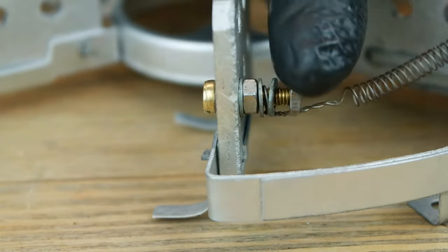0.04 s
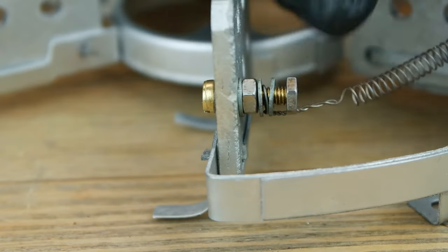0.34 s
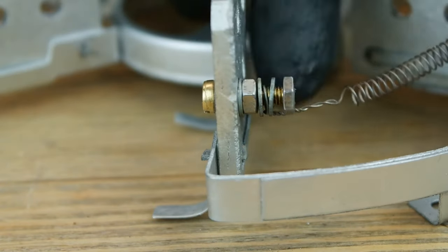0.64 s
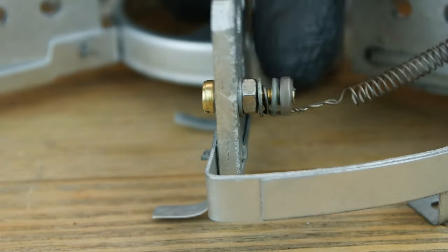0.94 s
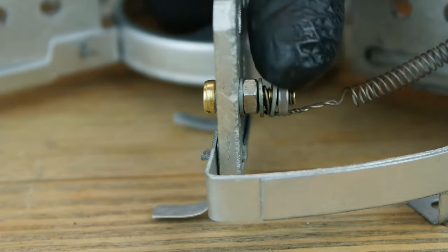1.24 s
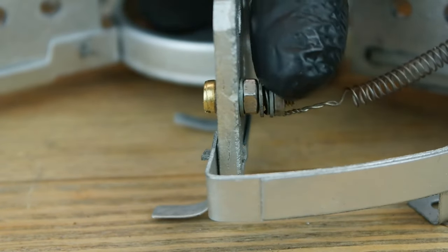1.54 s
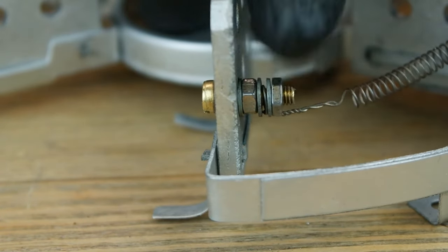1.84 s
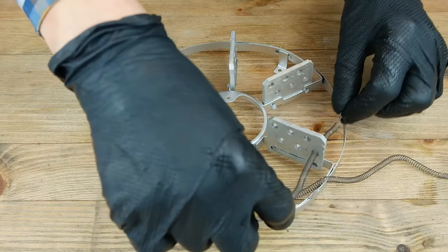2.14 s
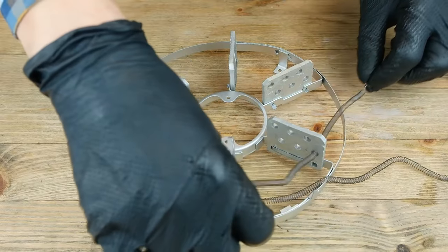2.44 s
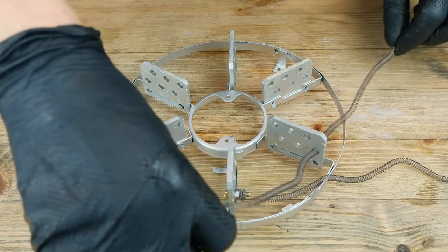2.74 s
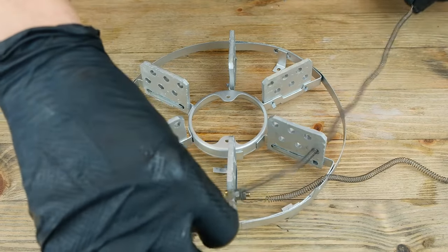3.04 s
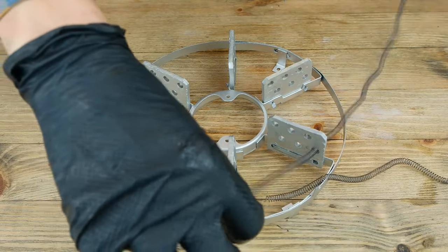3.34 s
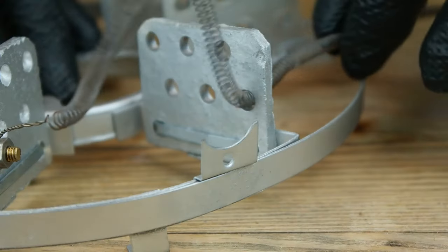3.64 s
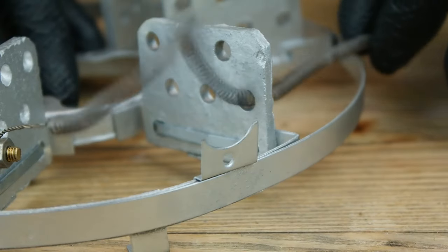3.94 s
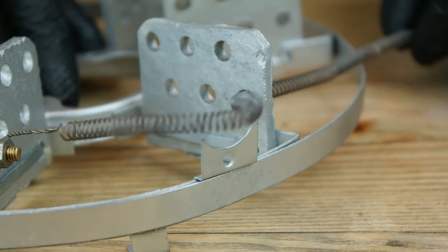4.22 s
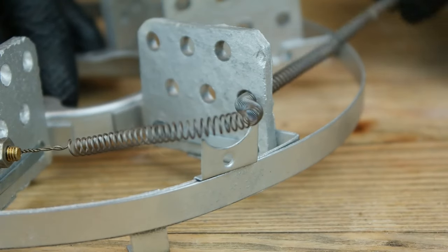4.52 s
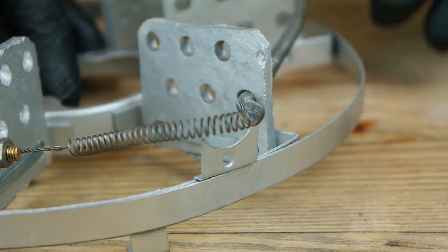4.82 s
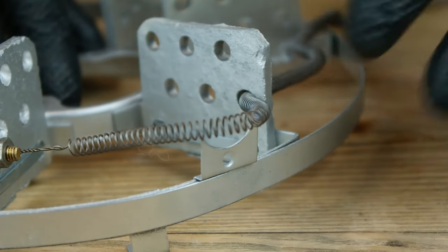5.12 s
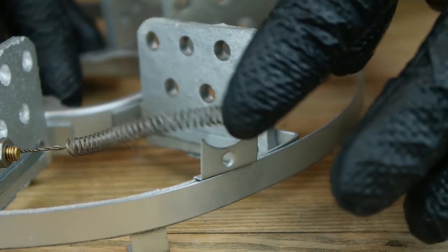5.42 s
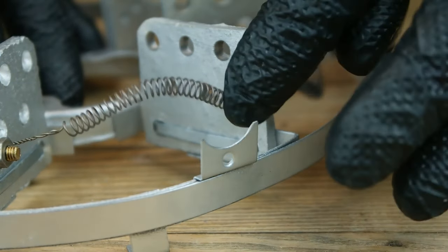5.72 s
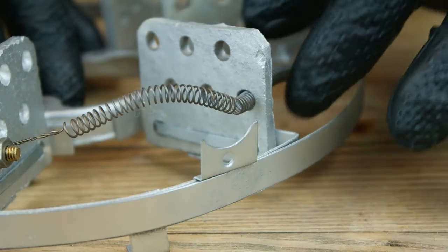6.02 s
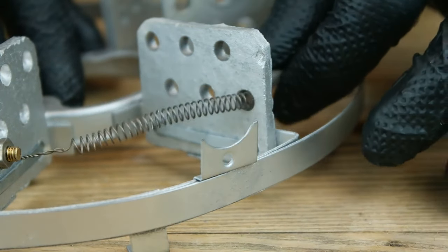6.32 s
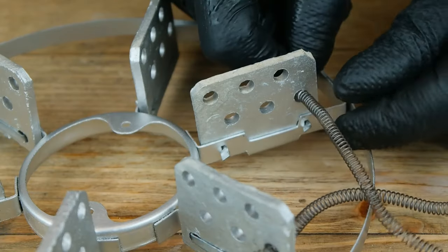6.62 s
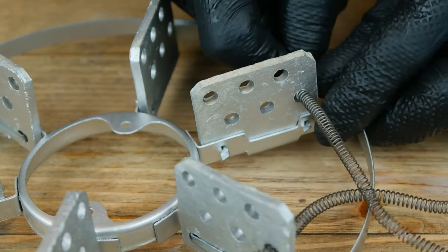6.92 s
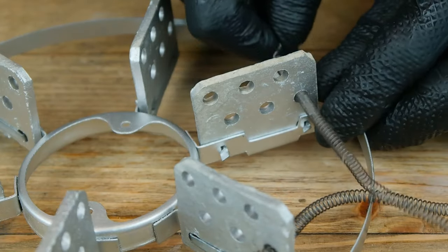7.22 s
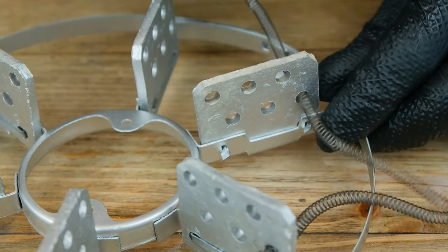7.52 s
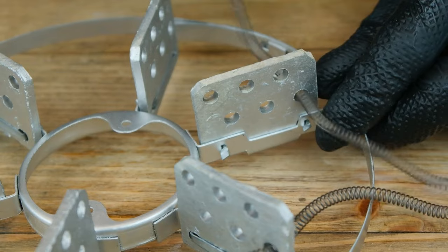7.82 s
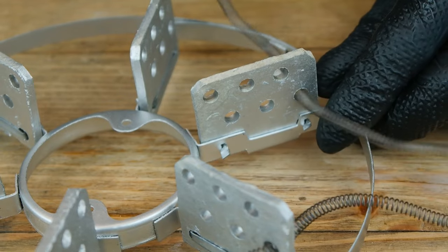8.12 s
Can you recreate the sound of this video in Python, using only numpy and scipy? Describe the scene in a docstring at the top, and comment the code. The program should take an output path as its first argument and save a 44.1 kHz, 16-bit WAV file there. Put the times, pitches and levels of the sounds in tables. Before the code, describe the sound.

Close up in a quiet room, light metallic ticks and tiny rasps come from a nut turning on its thread. A coil of wire then drags over the edges of a metal frame, building into a cluster of catches that rattle, zing and ring like a shaken spring. The frame bumps softly on a wooden bench. A few more snags ring out, the ringing cuts off, and the coil scrapes through once more.

```python
"""A long wire coil is threaded through the plates of a metal frame, after gloved fingers have spun a
small nut onto a terminal. The nut rasps and ticks on its bolt; then the turns of the coil scrape, snag
and zing on the edges of the holes. A snag sets the slack coil shimmering like a spring reverb or, when
the coil is taut, rings the frame, which stands on a wooden bench in a quiet room."""
import sys
import numpy as np
from scipy import signal
from scipy.fft import rfft, irfft
from scipy.io import wavfile
from scipy.ndimage import uniform_filter1d

SR = 44100
rng = np.random.default_rng(int(sys.argv[2]) if len(sys.argv) > 2 else 0)


def persist_wave(psi):
    """Save psi, clipped to +-1, as 16-bit WAV."""
    counts = np.round(np.clip(psi, -1, 1) * 32767).astype(np.int16)
    wavfile.write(sys.argv[1], SR, np.atleast_2d(counts).T)


N = 368676
TIME, BINS = np.arange(N) / SR, np.fft.rfftfreq(N, 1 / SR)

# The two long pulls of the coil through a hole. Each row: time in seconds, effort in dB.
FIRST_PULL = [(2.07, -70), (2.08, -60.5), (2.248, -58), (2.288, -70), (2.32, -57), (2.448, -44.5),
              (2.524, -57.5), (2.638, -39), (2.814, -46.5), (2.894, -38), (3.092, -44), (3.104, -41),
              (3.5, -43.5)]
LAST_PULL = [(7.17, -57), (7.672, -40), (7.812, -44), (7.832, -41.5), (7.978, -44), (8.098, -39.5),
             (8.17, -46), (8.31, -37), (8.36, -43)]
# The colour of the coil's shimmer. Each row: frequency in Hz, relative level in dB.
COIL_SPECTRUM = [(35, -30), (60, -29), (110, -14), (200, -9.5), (300, -14.5), (400, -0.5), (520, -5),
                 (650, -4.5), (1000, -3), (1750, -4), (2600, -7), (3400, -11), (13800, -12), (15500, -12)]


def amp(db):
    """Decibels to gain."""
    return 10 ** (np.asarray(db) / 20)


def unit_rms(x):
    """Scales to rms 1."""
    return x / np.sqrt(np.mean(x ** 2) + 1e-20)


def curve_at(points, hz):
    """Reads a table on a log-frequency axis."""
    f, value = np.transpose(points)
    return np.interp(np.log(hz + 1), np.log(f + 1), value)


def envelope(rows):
    """A smooth gain curve through (seconds, dB) points; silent outside them."""
    s, db = np.transpose(rows)
    return uniform_filter1d(amp(np.interp(TIME, s, db, left=-120, right=-120)), 200)


def add(mix, s, sound):
    """Mixes a stereo sound in at s seconds."""
    part = mix[:, round(s * SR):][:, :sound.shape[1]]
    part += sound[:, :part.shape[1]]


def convolve(x, response):
    """Passes x through an impulse response."""
    return signal.fftconvolve(np.atleast_2d(x), np.atleast_2d(response), axes=1)[:, :N]


def noise(spectrum):
    """Coloured stereo noise, alike in both ears in the bass and diffuse in the treble."""
    # Each row: frequency in Hz, left-right correlation.
    likeness = [(60, 0.69), (300, 0.7), (640, 0.77), (1400, 0.59), (3100, 0.12), (7000, 0.032),
                (15000, .05)]
    left, other = rfft(rng.standard_normal((2, N)))
    same = np.clip(curve_at(likeness, BINS), -1, 1)
    right = same * left + np.sqrt(1 - same ** 2) * other
    return unit_rms(irfft(np.array([left, right]) * amp(curve_at(spectrum, BINS)), N))


def grains(size, per_s, spread_db):
    """Tiny impacts of uneven strength; each radiates differently to the two sides."""
    strength = amp(spread_db * np.minimum(rng.exponential(1, size), 4))
    hit = rng.random(size) < per_s / SR
    return unit_rms(strength * hit * rng.uniform(-1.08, 1, (2, size)))


def metal(x, spectrum, peaks, scatter_db, scatter_s):
    """The colour of a small metal part, followed by scatter from the plates and bench around it."""
    size = 4096
    hz = abs(np.fft.fftfreq(size, 1 / SR))
    resonance_db = sum(lift / (1 + (2 * (hz - f) / width) ** 2) for f, width, lift in peaks)
    log_gain = np.log(amp(curve_at(spectrum, hz) + resonance_db))
    minimum_phase = np.exp(np.conj(signal.hilbert(log_gain)))
    tick = np.fft.ifft(minimum_phase).real[:size // 2]
    direct = convolve(x, tick / np.linalg.norm(tick))
    scatter = rng.standard_normal((2, size)) * np.exp(-TIME[:size] / scatter_s)
    return direct + amp(scatter_db) * convolve(direct, scatter / np.linalg.norm(scatter[0]))


def skip(fade_s, rise_share=0.029):
    """A quick run of impacts that builds up, then dies away as the wire or nut settles."""
    t = TIME[:SR // 3]
    shape = (1 - np.exp(-t / (rise_share * fade_s))) * np.exp(-t / fade_s)
    run = grains(len(t), per_s=9000, spread_db=2) * shape
    return run * np.linalg.norm(shape) / np.linalg.norm(run, axis=1, keepdims=True)


def modal_response(modes):
    """Decaying modes, wider in stereo the higher they lie; so small a body radiates no bass."""
    t = TIME[:SR * 3 // 4]
    lag_s = rng.normal(0, .00008, (len(modes), 2, 1))
    ring = sum(amp(db - 60 * t / t60) * np.sin(2 * np.pi * hz * (t + lag))
               for (hz, db, t60), lag in zip(modes, lag_s))
    return signal.sosfilt(signal.butter(4, 270, "highpass", fs=SR, output="sos"), ring)


def room_tone(level_db=-77.5):
    """The faint hiss of the quiet room."""
    # Each row: frequency in Hz, relative level in dB.
    spectrum = [(18, -47), (30, -37), (69, 7.5), (130, -22), (197, -7), (1290, -12.5), (3230, -18),
                (15500, -24)]
    return amp(level_db) * noise(spectrum)


def nut(rasp_db=-4, tick_db=3, bolt_db=-8, flick_s=0.027, coast_s=0.12, coast_db=-12.5):
    """The nut rasps along its thread at each flick and ticks in its play; the bolt rings on."""
    # Each row: moment of fastest turning in seconds, relative rasp level in dB.
    flicks = [(0.29, -59), (0.648, -43.5), (1.0, -42.5), (1.359, -36.5), (1.665, -47)]
    # Each row: start in seconds, relative level in dB.
    ticks = [(0.277, -55), (0.582, -43.5), (0.651, -42), (0.668, -38), (1.002, -30.5), (1.022, -38),
             (1.217, -48), (1.329, -38), (1.682, -36.5), (1.719, -39), (2.013, -55.5)]
    # The bolt and its washers. Each row: frequency in Hz, relative level in dB, T60 in seconds.
    bolt_modes = [(6080, -9, .28), (5850, -7, 0.25), (8040, 0.5, 0.18), (8160, -16, .2),
                  (10400, -12, 0.088), (10460, -3, 0.16), (10860, 6, 0.073), (10830, 0, .15),
                  (12950, 0, 0.099)]
    # Each row: frequency in Hz, relative level in dB.
    thread_spectrum = [(80, -50), (300, -5), (1500, -15.5), (3200, -20.5), (5000, -8.5), (7500, -7),
                       (10500, -1), (13000, -5.5), (15500, -7)]
    # The nut's bright resonances. Each row: centre in Hz, width in Hz, lift in dB.
    nut_peaks = [(5800, 160, 3), (7940, 180, 3), (9770, 400, 4.7), (10200, 450, 3.4), (12000, 250, 3),
                 (13100, 300, 4)]
    turning = np.zeros(N)
    for s, db in flicks:
        flick = np.exp(-((TIME - s) / flick_s) ** 2)
        coast = amp(coast_db) * np.exp(-abs(TIME - s) / coast_s)
        turning += amp(db) * (flick + coast)
    drive = amp(rasp_db) * turning * grains(N, per_s=900, spread_db=1)
    for s, db in ticks:
        add(drive, s, amp(db + tick_db) * skip(fade_s=0.0049))
    bolt = modal_response(bolt_modes)
    ring = amp(bolt_db) * convolve(drive, bolt / np.linalg.norm(bolt[0]))
    contact = metal(drive, thread_spectrum, nut_peaks, scatter_db=-6.5, scatter_s=0.046)
    lean_right = amp([[-1.5], [1.5]])
    return lean_right * (contact + ring)


def frame_response(drift_share=0.0019, wire_above_hz=5000):
    """Frame and wire ring together; only the wire's high modes move with each new point of contact."""
    # Each row: frequency in Hz, relative level in dB, T60 in seconds.
    modes = [(370.4, -5.5, 0.69), (389.6, -9.5, 0.48), (404.5, -3, 0.43), (427.7, -3.5, 0.29),
             (461, -11, 0.63), (661, -16, 0.98), (916, -9, 0.36), (1006, -3.5, 0.33), (1099, -7, 0.36),
             (1510, -6.5, 0.27), (1614, -8, 0.56), (1630, -7, 0.3), (7070, 1, 0.11), (6880, -2, 0.14),
             (8400, -2.5, 0.14), (11983, 3, .11), (12783, -4, .1), (12947, 4.5, 0.13), (13100, -1, .08),
             (13350, -4, .1)]
    drift = drift_share * rng.standard_normal(len(modes))
    return modal_response([(hz * (1 + d * (hz > wire_above_hz)), db, t60)
                           for (hz, db, t60), d in zip(modes, drift)])


def lingering(gain, fade_s):
    """The level of a body that stores what drives it and lets it go slowly."""
    keep = np.exp(-2 / (fade_s * SR))
    return np.sqrt(signal.lfilter([1 - keep], [1, -keep], gain ** 2))


def handling(frame, last_pull_db=3, frame_db=-16):
    """Holding and pulling keep coil and frame ringing with light touches, and rumble in the bench."""
    # The hands keep the coil faintly astir. Each row: time in seconds, level in dB.
    hold = [(0.26, -67.5), (0.58, -56), (1.7, -56.5), (2.0, -62), (4.8, -59), (5.35, -62), (6.08, -63),
            (6.25, -49.5), (6.43, -41.5), (6.45, -60), (6.8, -53), (7.0, -53.5), (7.3, -57)]
    # The hands press the frame on the bench. Each row: start in seconds, level in dB, fade in seconds.
    thuds = [(2.45, -66, 0.046), (3.51, -56, .06), (3.971, -47.5, 0.22), (4.365, -62, 0.04),
             (5.67, -50, 0.15), (6.95, -67, 0.032), (7.62, -59, 0.07)]
    held = envelope(hold)
    first = lingering(envelope(FIRST_PULL), fade_s=0.18)
    last = lingering(envelope(LAST_PULL), fade_s=0.0067)
    touches = grains(N, per_s=600, spread_db=3.5)[0]
    ringing = noise(COIL_SPECTRUM) + amp(frame_db) * unit_rms(convolve(touches, frame))
    ring_gain = np.sqrt(held ** 2 + first ** 2 + (amp(last_pull_db) * last) ** 2)
    pressing = sum(amp(db) * (TIME > s) * np.exp(-abs(TIME - s) / fade_s) for s, db, fade_s in thuds)
    rumble_gain = amp(-11) * held + amp(-16) * first + amp(-26) * last + uniform_filter1d(pressing, 600)
    # Each row: frequency in Hz, relative level in dB.
    bench_spectrum = [(25, -22), (60, -20.5), (110, -8), (190, -0.5), (280, -1), (450, -9), (1000, -8),
                      (4000, -74)]
    return ring_gain * ringing + rumble_gain * noise(bench_spectrum)


def grip_and_give(depth_db, step_s):
    """A gain that wanders as the wire grips and gives."""
    steps = rng.standard_normal(2000)
    return amp(depth_db * np.interp(TIME / step_s, np.arange(len(steps)), steps))


def pulls():
    """Turn after turn scrapes over the edge of a hole, as hard as the hand pulls."""
    # Each row: frequency in Hz, relative level in dB.
    scrape_spectrum = [(300, -27), (2500, -4.5), (5000, -11.5), (8000, -14.5), (9600, -11.5), (11000, -1),
                       (12500, -0.5), (15500, -2)]
    # The wire's resonances in each pull. Each row: centre in Hz, width in Hz, lift in dB.
    first_peaks = [(8300, 280, 12.3), (11900, 110, 3.5), (11930, 91, 6.9), (12600, 84, 4),
                   (15500, 440, 6.5)]
    last_peaks = [(1760, 650, 17), (7640, 150, 8), (10460, 200, 7), (14200, 130, 4)]
    grip = grip_and_give(depth_db=2, step_s=0.014)
    first = envelope(FIRST_PULL) * grip * grains(N, per_s=2600, spread_db=2.5)
    last = envelope(LAST_PULL) * grip * grains(N, per_s=1500, spread_db=2.5)
    return (metal(first, scrape_spectrum, first_peaks, scatter_db=3, scatter_s=0.006)
            + metal(last, scrape_spectrum, last_peaks, scatter_db=-1, scatter_s=0.013))


def coil_response(waves, rise_s=0.0016):
    """Waves disperse along the coil into a dense ring, different each time; the top dies first."""
    # Each row: frequency in Hz, T60 in seconds.
    ring_times = [(100, 0.8), (400, 0.74), (1500, 0.9), (3500, 0.86), (8000, 0.7), (15000, 0.68)]
    start = rng.integers(0, N - SR)
    hz, t, bands = signal.stft(waves[:, start:start + SR * 3 // 4], SR, nperseg=256)
    decay = amp(-60 * t / curve_at(ring_times, hz)[:, None])
    ring = signal.istft(bands * decay, SR, nperseg=256)[1]
    return ring * (1 - np.exp(-TIME[:ring.shape[1]] / rise_s))


def snags(frames, rattle_db=4, knee_db=-35.5, push_slope=0.83, feed_s=0.0051, stop_s=6.44):
    """Each snag or tug rattles at the hole and rings on: in the coil if slack, more in the frame if taut."""
    # Single turns catch and skip free. Each row: start in seconds, relative rattle in dB, fade in seconds.
    catches = [(2.076, -53.5, 0.0094), (2.138, -51, 0.0078), (2.322, -46, .012), (2.576, -37.5, 0.0074),
               (3.514, -32.5, 0.028), (3.546, -27, 0.015), (3.6254, -25.5, 0.0074), (3.678, -29, 0.0073),
               (3.722, -30, 0.013), (3.788, -28, 0.0074), (3.965, -24, 0.017), (3.972, -15.5, 0.0072),
               (4.104, -29.5, 0.022), (4.212, -27.5, 0.015), (4.364, -26.5, 0.0083), (4.369, -20, .02),
               (4.375, -22.5, 0.0086), (4.855, -48, 0.036), (4.884, -35.5, 0.043), (5.220, -54, 0.05),
               (5.435, -46, 0.02), (5.493, -38.5, 0.026), (5.648, -35, .014), (5.676, -27.5, 0.013),
               (6.269, -35, 0.017), (6.273, -26, 0.0063), (6.2961, -28.5, 0.0078), (6.591, -40, 0.0074),
               (6.602, -33, 0.0038), (7.806, -37, .02), (8.004, -36.5, .009), (8.041, -34.5, 0.022),
               (8.070, -30.5, 0.0054), (8.257, -36.5, 0.036)]
    # Each row: start and length in seconds, then relative rattle and push on coil and frame in dB.
    tugs = [(3.504, 0.32, -50, -39.5), (3.982, 0.15, -33, -32.5), (4.402, 0.098, -41, -41.5),
            (4.90, .11, -40, -39.5), (5.66, .12, -42, -39), (6.275, 0.05, -41, -43)]
    # The stretch of the coil. Each row: time in seconds, tension from 0 (slack) to 1 (taut).
    stretch = [(2.6, 0.2), (3.5, 0.82), (4.4, 0.79), (4.85, 0.26), (5.7, 0.13), (6.27, 0.93), (6.6, 0),
               (8.3, 0.76)]
    # Each row: frequency in Hz, relative level in dB.
    rattle_spectrum = [(80, -73), (300, -78), (1500, -10.5), (3500, -6.5), (5000, -4), (7000, -2.5),
                       (9500, -2), (12000, 3.5), (15500, 1.5)]
    # The wire's bright resonances. Each row: centre in Hz, width in Hz, lift in dB.
    wire_peaks = [(7280, 300, 5), (8070, 510, 5), (11100, 200, 7), (13230, 230, 7)]
    rattle, ring = np.zeros((2, 2, N))
    waves = noise(COIL_SPECTRUM)
    coils = [coil_response(waves) for _ in range(7)]
    # The harder a snag, the more of it is spent as rattle rather than push.
    bursts = [(s, db, knee_db + push_slope * (db - knee_db), skip(fade_s)) for s, db, fade_s in catches]
    bursts += [(s, db, push_db, tug(length_s)) for s, length_s, db, push_db in tugs]
    for k, (s, db, push_db, burst) in enumerate(bursts):
        add(rattle, s, amp(db + rattle_db) * burst)
        tension = np.interp(s, *np.transpose(stretch))
        coil_db, frame_db = -5 - 10 * tension, -23 + 9 * tension
        frame = frames[k % len(frames)]
        coil = coils[k % len(coils)][:, :frame.shape[1]]
        push = amp(push_db) * burst[0] / np.sqrt(feed_s * SR)
        tail = convolve(push, amp(coil_db) * coil + amp(frame_db) * frame)
        if s < stop_s:  # tails still ringing at stop_s stop short
            tail *= np.clip((stop_s - s - TIME[:tail.shape[1]]) / 0.0018, 0, 1)
        add(ring, s, tail)
    return metal(rattle, rattle_spectrum, wire_peaks, scatter_db=-9, scatter_s=0.012) + ring


def tug(length_s, rise_s=0.0013, release_s=0.039):
    """A run of turns drags over the edge: impacts start at once, hold while the hand moves, then fade."""
    t = TIME[:SR * 2 // 3]
    shape = (1 - np.exp(-t / rise_s)) * np.exp(-np.maximum(t - length_s, 0) / release_s)
    return shape * grains(len(t), per_s=4000, spread_db=2.5)


def zings(width_hz=220, rise_s=0.001):
    """The wire sticks and slips rapidly on an edge, exciting one narrow resonance."""
    # Each row: start in seconds, pitch in Hz, level in dB, fade in seconds.
    slips = [(3.72, 12600, -30, 0.017), (3.975, 13000, -32, 0.088), (4.03, 7100, -33.5, .08),
             (6.269, 8260, -30, 0.034), (7.069, 7560, -56, 0.065), (7.828, 3900, -37.5, .02),
             (8.004, 7400, -39, 0.011), (8.042, 7600, -42, 0.018), (8.255, 7540, -45, 0.034)]
    out, t = np.zeros((2, N)), TIME[:SR // 3]
    for s, hz, db, fade_s in slips:
        resonance = signal.iirpeak(hz, hz / width_hz, fs=SR)
        tone = unit_rms(signal.lfilter(*resonance, rng.standard_normal((2, len(t)))))
        add(out, s, amp(db) * tone * (1 - np.exp(-t / rise_s)) * np.exp(-t / fade_s))
    return out


def scene():
    """All sources over the room tone, a little to the right."""
    # Each row: frequency in Hz, left minus right in dB.
    balance = [(60, -3.5), (380, -4.5), (1300, -4), (4400, -2.5), (8100, -5), (15000, -1.5)]
    frames = [frame_response() for _ in range(5)]
    mix = nut() + pulls() + handling(frames[0]) + snags(frames) + zings() + room_tone()
    side_gains = amp(np.outer([.5, -.5], curve_at(balance, BINS)))
    return irfft(rfft(mix) * side_gains, N)


def record(dry):
    """A clean, steep low-pass takes off the very top."""
    lowpass = signal.firwin(511, cutoff=15850, window=("kaiser", 9), fs=SR)
    return signal.oaconvolve(dry, lowpass[None], "same")


dry = scene()
out = record(dry)
persist_wave(out)
```